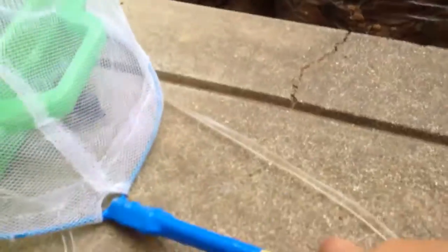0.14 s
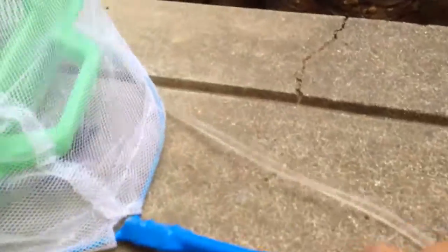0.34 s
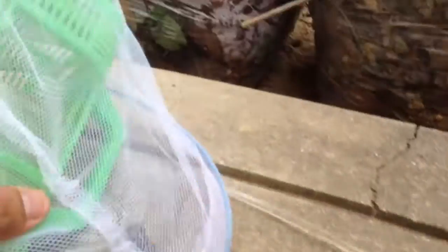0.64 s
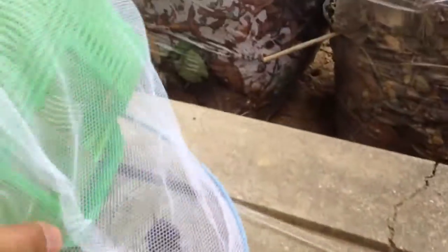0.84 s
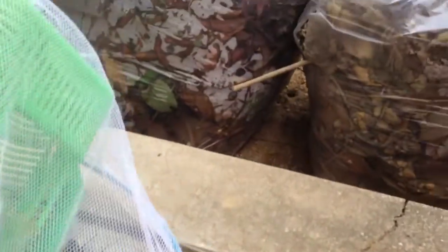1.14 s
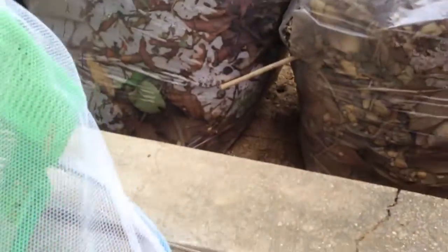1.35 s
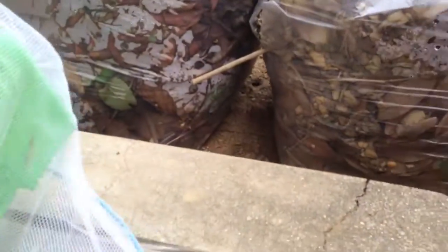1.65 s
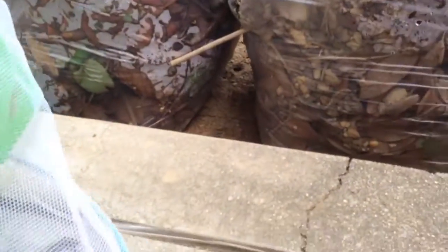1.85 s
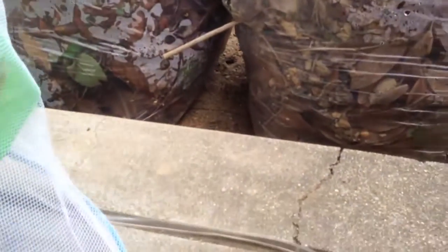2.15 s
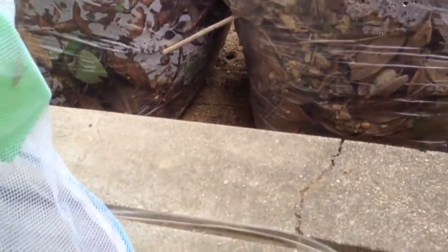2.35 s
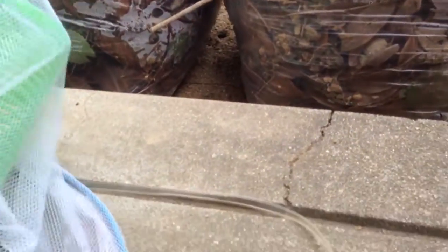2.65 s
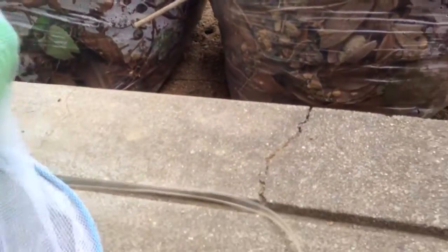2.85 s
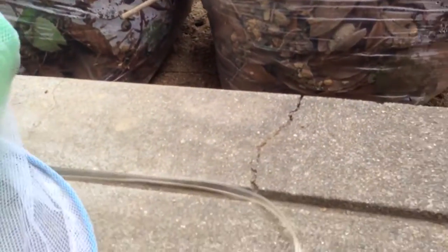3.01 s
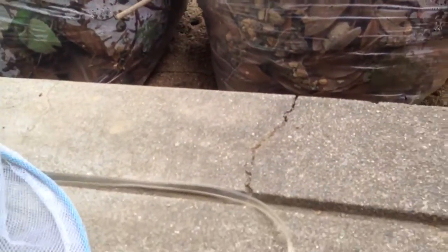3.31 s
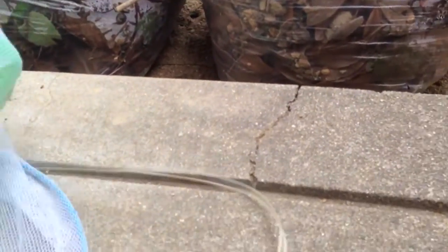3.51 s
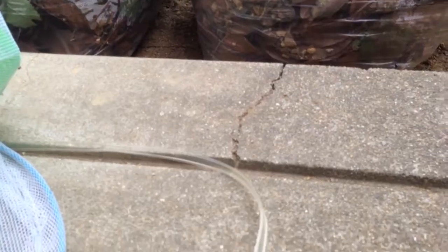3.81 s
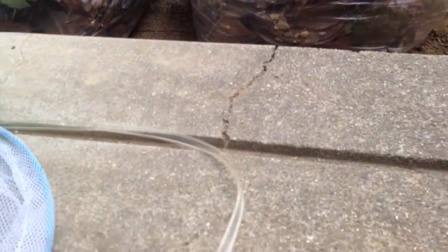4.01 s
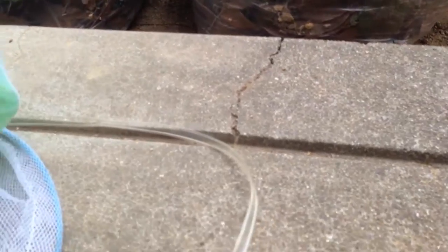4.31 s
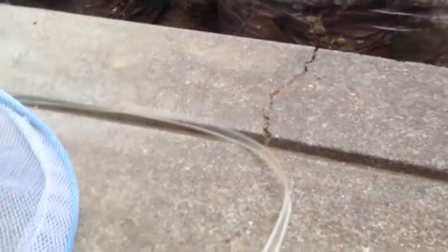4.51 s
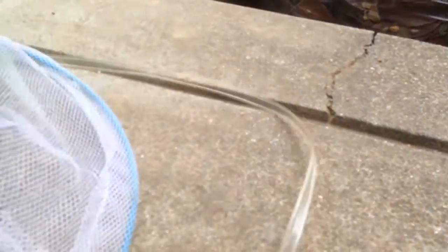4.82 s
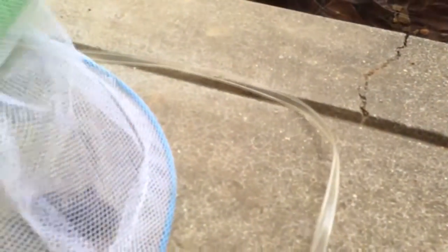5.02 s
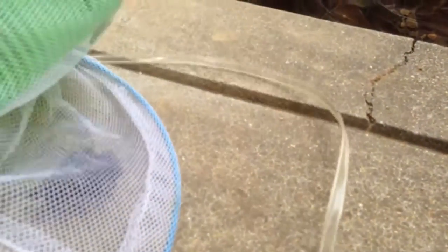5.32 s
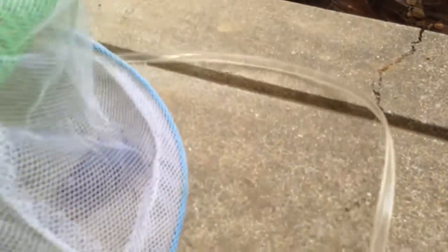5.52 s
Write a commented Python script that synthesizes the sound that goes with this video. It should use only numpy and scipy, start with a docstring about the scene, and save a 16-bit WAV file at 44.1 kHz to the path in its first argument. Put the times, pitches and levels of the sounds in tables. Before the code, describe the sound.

Bright, scratchy wing strokes buzz unevenly against taut netting, roughly two dozen a second, some ending in a hard click and rattle. Low bumps and handling rumble come from the plastic basket underneath. A short lull leaves faint squeaky rubs and quiet air, then the strokes resume, with the strongest slaps around five seconds. Single-channel, close handheld pickup outdoors, without noticeable echo.

```python
"""Outdoors on concrete, a large winged insect thrashes inside a mesh net draped over a plastic basket.
Each wing stroke is a short gritty scrape: clumped friction noise shaped by the spectrum of the mesh.
Some strokes slap with a sharp crack, a click and a rattle; body thumps excite the modes of the basket walls.
For about a second the strokes pause while the net rubs on the resonant basket ribs; then they resume.
Shaking adds a lumpy rumble, over a faint coloured noise of still air."""
import sys
import numpy as np
from scipy import signal
from scipy.fft import rfft, irfft, next_fast_len
from scipy.io import wavfile
from scipy.ndimage import uniform_filter1d

SR = 44100
rng = np.random.default_rng(int(sys.argv[2]) if len(sys.argv) > 2 else 0)


def boost_factor(decibels):
    """Convert a level in decibels to a linear amplitude factor."""
    exponent = np.asarray(decibels, float) / 20
    return 10 ** exponent


def to_wav(sig):
    """Store sig (one row per channel, or 1-D mono) as 16-bit WAV at the path in sys.argv[1].

    Samples outside -1..1 are clipped; the rate is SR.
    """
    pcm = np.clip(np.atleast_2d(sig), -1, 1) * 32767
    pcm = np.round(pcm).astype(np.int16)
    wavfile.write(sys.argv[1], SR, pcm.T)  # frames by channels


N = 249606   # length [samples]

# wing strokes scraping the mesh: (time [s], relative level [dB], contact [ms])
WING_STROKES = [(0.023, -25.5, 19.4), (0.052, -13.5, 3.1), (0.103, -22, 12.2), (0.165, -28.5, 17),
                (0.332, -28.5, 26.6), (0.531, -30.5, 7.8), (0.559, -38, 4.2), (0.638, -18.5, 4.7),
                (0.684, -28, 2.1), (0.699, -26, 17), (0.745, -29.5, 9.2), (0.774, -32, 17),
                (0.815, -25, 8.3), (0.829, -24.5, 9), (0.844, -18, 4.2), (0.862, -30, 6.4),
                (0.878, -25, 9.8), (0.905, -25.5, 14), (0.919, -25.5, 9), (0.939, -25, 14), (0.953, -27, 8),
                (0.981, -20, 13.5), (1.003, -30, 15), (1.066, -27, 26), (1.107, -24, 12), (1.117, -19, 11),
                (1.137, -25.5, 10), (1.177, -25, 11), (1.22, -26, 12.3), (1.253, -24, 1.5),
                (1.279, -27, 4.8), (1.29, -18, 2.8), (1.306, -30, 40.5), (1.358, -27.5, 28),
                (1.387, -22.5, 8.8), (1.414, -25, 13), (1.442, -26.5, 12), (1.482, -21, 4.7),
                (1.488, -28, 23.4), (1.52, -25.5, 16.4), (1.553, -32, 32), (1.596, -21, 11),
                (1.624, -25.5, 6.9), (1.678, -28, 1.5), (1.695, -22, 26), (1.733, -27.5, 16),
                (1.775, -22.5, 15.3), (1.817, -26.5, 23.3), (1.877, -22, 11.3), (1.941, -23, 5.1),
                (1.99, -27, 8.3), (2.026, -28.5, 18.5), (2.085, -26.5, 7.2), (2.112, -23.5, 11),
                (2.182, -27, 2.7), (2.199, -18.5, 3.9), (2.257, -26, 9), (2.308, -21, 2.8),
                (2.325, -25.5, 6.8), (2.349, -16.5, 0.63), (2.375, -24.5, 23), (2.403, -21.5, 5.9),
                (2.46, -29.5, 5), (2.544, -28, 8), (2.575, -29, 15), (2.598, -15.5, 4.7),
                (2.645, -26.5, 8.1), (2.68, -29.5, 7.7), (2.71, -25, 28), (2.749, -21, 7.6),
                (2.789, -31.5, 8.8), (2.834, -23, 2.9), (2.872, -21.5, 4.4), (2.976, -31.5, 9.7),
                (2.997, -25, 5.9), (3.017, -32.5, 25), (3.07, -22, 0.78), (3.094, -21.5, 2.8),
                (3.13, -19, 9.2), (3.172, -19.5, 7.8), (3.212, -20.5, 7.6), (3.257, -25.5, 16),
                (3.3, -24, 19.5), (3.368, -23, 16.6), (3.412, -27.5, 22.7), (3.472, -22.5, 14.4),
                (3.513, -31, 27), (3.602, -19, 11.4), (3.639, -20.5, 5.1), (3.667, -41, 1.5),
                (4.596, -26.5, 13.5), (4.627, -27, 24), (4.669, -22, 6.9), (4.702, -19, 17.4),
                (4.756, -26.5, 14.3), (4.797, -22, 5.5), (4.804, -21.5, 19), (4.873, -21, 7.5),
                (4.894, -28.5, 26), (4.976, -15, 1.3), (5.004, -10, 2.5), (5.037, -20, 8.3), (5.07, -30, 6),
                (5.097, -27.5, 16), (5.118, -31.5, 25.5), (5.151, -28.5, 15), (5.183, -28.5, 11),
                (5.221, -31, 12), (5.258, -24, 7.5), (5.318, -24.5, 13), (5.358, -37, 4.6),
                (5.372, -31, 17), (5.403, -21.5, 7.8), (5.433, -34.5, 21), (5.483, -28, 3.4),
                (5.498, -33.5, 6.4)]


def rms_one(x):
    """Normalisation: scale to unit root-mean-square."""
    return x / np.sqrt(np.mean(x ** 2) + 1e-20)


def drift(rate_hz):
    """Slow random modulation of unit rms: noise through two equal one-pole low-passes."""
    r = np.exp(-2 * np.pi * rate_hz / SR)
    noise = rng.standard_normal(N + SR)
    return rms_one(signal.lfilter([1], [1, -2 * r, r * r], noise)[SR:])   # without the first second, to settle


def in_time(s, values):
    """Linear interpolation between points in time."""
    return np.interp(np.arange(N) / SR, s, values)


def coloured(x, points, weight=lambda octave: 1):
    """Spectral shaping at constant white-noise rms; weight then picks a part of the spectrum."""
    size = next_fast_len(N)
    octave = np.log2(np.arange(size // 2 + 1) * SR / size + 1)
    hz, db = np.transpose(points)
    shape = rms_one(boost_factor(np.interp(octave, np.log2(hz), db)))
    return irfft(rfft(x, size) * shape * weight(octave), size)[:N]


def bandpass(x, low_hz, high_hz):
    """Band limitation by a Butterworth filter."""
    return signal.sosfilt(signal.butter(2, [low_hz, high_hz], "band", fs=SR, output="sos"), x)


def decay(x, t60):
    """Exponential relaxation: each click falls by 60 dB in t60 seconds."""
    return signal.lfilter([1], [1, -boost_factor(-60 / (t60 * SR))], x + 1e-18)


def ring(x, hz, t60):
    """Damped resonance: a unit click starts a decaying sine of initial height 1."""
    r, w = boost_factor(-60 / (t60 * SR)), 2 * np.pi * hz / SR
    return signal.lfilter([0, np.sin(w)], [1, -2 * r * np.cos(w), r * r], x + 1e-18)


def contact(rows):
    """Contact pressure: touch, sagging hold, lift and shivering cloth; long contacts rise and fall slower."""
    power, t_ms = np.zeros(N), np.arange(SR // 4) * 1000 / SR
    for s, level_db, ms in rows:
        after = np.maximum(t_ms - ms, 0)
        touch = 1 - np.exp(-t_ms / (0.65 + 0.076 * ms))
        hold = touch * boost_factor(level_db - 5.54 * np.minimum(t_ms / ms, 1))
        # release and faint shiver weight the power, so the level falls by half these dB
        lift = boost_factor(-71.0 * after / (6.1 + 0.2 * ms)) + boost_factor(-31.0 - 0.66 * after)
        i = int(s * SR)
        power[i:i + len(t_ms)] += (hold ** 2 * lift)[:N - i]
    return np.sqrt(power)


def grit():
    """Stick-slip friction: threads slip in clumps of finer snaps, and some let go with a tick."""
    ticks_per_s, tick_db, tick_spread_db, tick_t60_s = 130, 3.5, 0.5, 0.0032   # over the scrape
    even_ms = 8   # the grit keeps a steady strength over this span
    heights = boost_factor(tick_db + tick_spread_db * rng.standard_normal(N))
    snaps = (rng.random(N) < ticks_per_s / SR) * heights
    ticks = decay(snaps, tick_t60_s)
    clumps = boost_factor(3.4 * drift(106) + 1.6 * drift(2100)) * (1 + ticks)
    clumps = clumps / np.sqrt(uniform_filter1d(clumps ** 2, size=int(even_ms * SR / 1000)))
    return rms_one(rng.standard_normal(N) * clumps)


def still_air():
    """Stationary background: white noise coloured by the spectrum of the still air."""
    # spectrum of the air: (frequency [Hz], relative level per Hz [dB])
    air_spectrum = [(24, -49), (40, -5), (96, -21), (118, -27), (392, -2.5), (11600, -15), (16000, -17)]
    return boost_factor(-64.5) * coloured(rng.standard_normal(N), air_spectrum)


def basket():
    """Modal excitation: soft blows ring the walls; shaking rumbles in the same modes and below."""
    # body against the basket: (time [s], relative blow level [dB])
    thump_table = [(0.641, -30), (1.077, -42.5), (1.497, -41), (2.255, -44), (2.545, -36), (4.22, -45),
                   (4.707, -40), (4.985, -36), (5.26, -47)]
    # modes of the basket walls: (frequency [Hz], relative level [dB], 60 dB decay time [s])
    wall_modes = [(183.5, 0, 0.086), (227, 2, 0.038)]
    # shaking of the basket: (time [s], rumble of the walls [dB], deep rumble [dB])
    shake_table = [(0.0, -52, -78), (0.58, -66.5, -73), (0.65, -38, -77), (0.79, -56, -50.5),
                   (1.27, -62.5, -76.5), (1.33, -46.5, -58), (1.62, -62, -83), (2.65, -58.5, -64),
                   (4.2, -70.5, -73.5), (4.32, -56, -67), (4.4, -67, -69), (4.7, -62.5, -64.5),
                   (4.87, -78, -58.5), (5.0, -48, -50), (5.04, -61, -59), (5.638, -62.5, -75),
                   (5.66, -28, -67)]
    s, blow_db = np.transpose(thump_table)
    blows = np.zeros(N)
    blows[(s * SR).astype(int)] = boost_factor(blow_db)
    # two running means soften each blow
    blows = uniform_filter1d(uniform_filter1d(blows, size=70), size=70)
    # the light basket radiates no deep bass
    blows = signal.sosfilt(signal.butter(2, 120, "high", fs=SR, output="sos"), blows + 1e-18)
    thumps = sum(boost_factor(db) * ring(blows, hz, t60) for hz, db, t60 in wall_modes)

    shake = rng.standard_normal(N) * boost_factor(4.8 * drift(34))   # lumpy noise
    modes = sum(boost_factor(db) * rms_one(ring(shake, hz, t60)) for hz, db, t60 in wall_modes)
    walls = rms_one(rms_one(bandpass(shake, 102, 465)) + boost_factor(-2.5) * modes)
    deep = rms_one(bandpass(shake, 49, 107))
    s, wall_db, deep_db = np.transpose(shake_table)
    rumble = boost_factor(in_time(s, wall_db)) * walls + boost_factor(in_time(s, deep_db)) * deep
    return rumble + thumps


def rubs():
    """Friction-driven resonance: cloth on plastic hisses and rings the ribs, most near the touch."""
    # net on the ribs: (time [s], relative level [dB], contact [ms], pitch of the rib nearest the touch [Hz])
    rub_table = [(.36, -51, 66, 2160), (2.704, -20, 3, 2650), (2.75, -23.5, 2, 2650), (3.944, -37, 78, 860),
                 (4.019, -33.5, 4, 1750), (4.123, -39.5, 25, 1710), (4.163, -44, 6.6, 5700),
                 (4.26, -48.5, 51, 1760), (4.431, -50.5, 80, 1750), (5.246, -29.5, 23, 1780),
                 (5.274, -20, 2.9, 2650), (5.42, -40, 130, 840), (5.489, -44.5, 60, 3900),
                 (5.578, -52, 69, 3750)]
    # resonances of the ribs: (frequency [Hz], relative level [dB], 60 dB decay time [s])
    rib_modes = [(856, -13, 0.02), (1720, -5, 0.04), (2100, -5, 0.013), (2650, -2, 0.011), (3900, 0, 0.01),
                 (5700, 4, 0.005)]
    hiss_db, loss_db_per_octave = -4, 16   # ribs further in pitch from the touch ring less
    slide = grit()
    out = boost_factor(hiss_db) * bandpass(slide * contact([row[:3] for row in rub_table]), 500, 7000)
    for hz, db, t60 in rib_modes:
        reached = [(s, level_db - loss_db_per_octave * abs(np.log2(hz / near_hz)), ms)
                   for s, level_db, ms, near_hz in rub_table]
        # a longer ring gathers more noise, hence the division
        gain = boost_factor(db) / np.sqrt(t60 * SR / 20)
        out += gain * ring(slide * contact(reached), hz, t60)
    return out


def drag():
    """Sliding contact: pressure before and after each stroke, over a clumpy crawl; powers add."""
    # legs and body dragging along the mesh between strokes: (time [s], level [dB])
    crawl_table = [(0.0, -48), (0.14, -37.5), (0.38, -56.5), (0.61, -48), (0.88, -33.5), (0.99, -50),
                   (1.46, -61), (1.91, -41), (2.05, -84), (2.43, -49.5), (2.561, -31.5), (2.69, -39),
                   (2.84, -59.5), (3.26, -43.5), (3.5, -44), (3.64, -62), (3.7, -87), (3.99, -60),
                   (4.11, -60.5), (4.52, -60), (4.67, -55), (4.79, -96), (4.89, -44), (5.26, -43),
                   (5.35, -44), (5.5, -55.5), (5.66, -60)]
    lead_db, lead_ms = -24, 8.9   # the wing brushes the mesh just before it bears down, relative to the stroke
    back_db, back_ms = -21.5, 30.3   # the wing slides back after the stroke, relative to it
    clump_db, clump_rate_hz = 2, 19
    back = contact([(s + ms / 1000, db + back_db, back_ms) for s, db, ms in WING_STROKES])
    lead = contact([(max(s - lead_ms / 1000, 0), db + lead_db, lead_ms) for s, db, ms in WING_STROKES])
    crawl = boost_factor(in_time(*np.transpose(crawl_table)) + clump_db * drift(clump_rate_hz))
    return np.sqrt(back ** 2 + lead ** 2 + crawl ** 2)


def wings():
    """Source and filter: scrapes and cracks excite the mesh; a flat contact moves more cloth, duller."""
    # stiff wing edge cracking on the net: (time [s], relative level [dB], dullness before band weighting [dB])
    slap_table = [(0.052, -2, 3), (0.105, -1.5, 4.5), (0.6386, 0.5, 17.5), (1.223, -3, 0.5),
                  (1.291, -2, -0.5), (1.78, 0, -4), (1.8817, 1.5, 8.5), (2.0255, -1.5, -14), (2.1987, 4, 3),
                  (2.601, -2.5, 12.5), (2.7039, 5.5, 3.5), (2.8327, 5.5, 4.5), (3.5249, -8.5, 5),
                  (3.601, -5, 2), (4.709, 0, 15.5), (4.874, -2.5, 7.5), (4.976, -4, -13), (5.007, 5, 1.5),
                  (5.0389, 7, 0.5), (5.073, 0, -15), (5.264, -5.5, 8), (5.3284, 1.5, -15)]
    # spectrum of the mesh: (frequency [Hz], relative level per Hz [dB])
    mesh_spectrum = [(220, -27.5), (650, -17.5), (1300, -15.5), (2500, -6), (4300, 0), (14000, 2.5),
                     (15200, 2.5), (16000, -29)]
    # how slack the net hangs: (time [s], dullness of lows against highs before band weighting [dB])
    slack_table = [(0, 6), (0.9, 2.5), (1.6, -1), (2.3, 0), (2.75, 6), (3.0, 1), (5.65, 2.5)]
    s, slap_db, slap_dull_db = np.transpose(slap_table)
    starts = (s * SR).astype(int)
    slaps = np.zeros(N)
    slaps[starts] = boost_factor(slap_db)
    dull_db = in_time(*np.transpose(slack_table)) + 5.9 * drift(27.0)
    for i, db in zip(starts, slap_dull_db):
        dull_db[i - 60:i + 250] = db   # each slap sets its own dullness
    dull_db = uniform_filter1d(dull_db, size=60)

    # a crack is a two-sided snap and a brief noisy rattle
    snap = slaps - 0.42 * np.roll(slaps, 3)
    rattle = decay(slaps, 0.0034) * rng.standard_normal(N)
    scrape = np.hypot(contact(WING_STROKES), drag()) * grit()
    drive = scrape + boost_factor(-12.5) * snap + boost_factor(-9.5) * rattle

    out = 0
    for centre in np.arange(8, 14.3, 1 / 5):   # overlapping triangular bands, in octaves above 1 Hz
        part = coloured(drive, mesh_spectrum, lambda octave: np.clip(1 - 5 * abs(octave - centre), 0, 1))
        # dullness lifts bands below 7 kHz and lowers those above
        lean = np.clip((np.log2(7000) - centre) * 0.38, -0.4, 0.9)
        # each touch rings other threads
        out = out + part * boost_factor(lean * (dull_db + 3.0) + 2.84 * drift(44.4))
    return out


def scene():
    """Superposition of insect, net, basket and still air, in one channel."""
    return (wings() + rubs() + basket() + still_air())[None]


def band_limit(x):
    """A steep low-pass at the top of the band."""
    return signal.sosfilt(signal.butter(12, 16490, fs=SR, output="sos"), x)


def record(dry):
    """Band limits and saturation: the microphone drops deep bass and rounds cracks; the top is cut."""
    mix = signal.sosfilt(signal.butter(2, 45, "high", fs=SR, output="sos"), dry)
    mix = 0.75 * np.tanh(mix / 0.75)
    # at least 26 dB down from 15.5 kHz upward
    mix = signal.sosfilt(signal.cheby2(10, 26, 15500, fs=SR, output="sos"), mix)
    return band_limit(mix)


dry = scene()
out = record(dry)
to_wav(out)
```